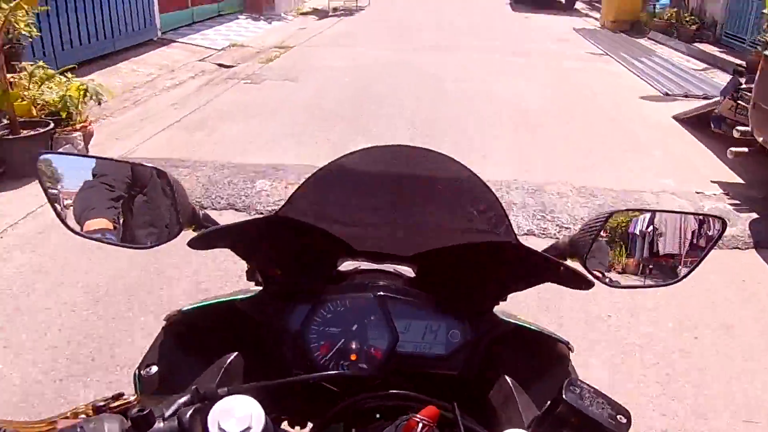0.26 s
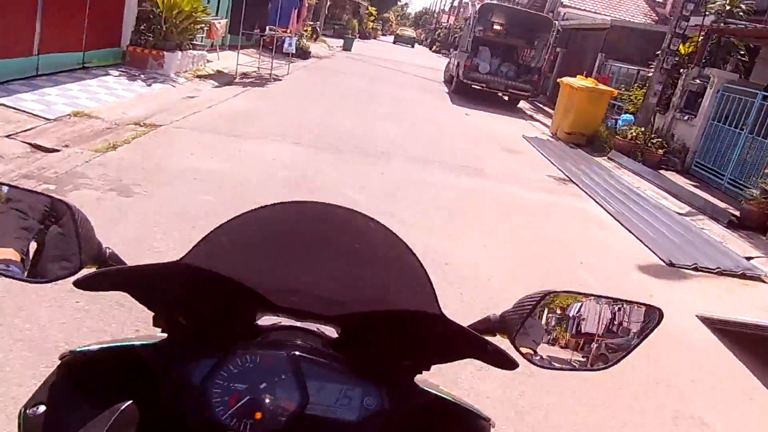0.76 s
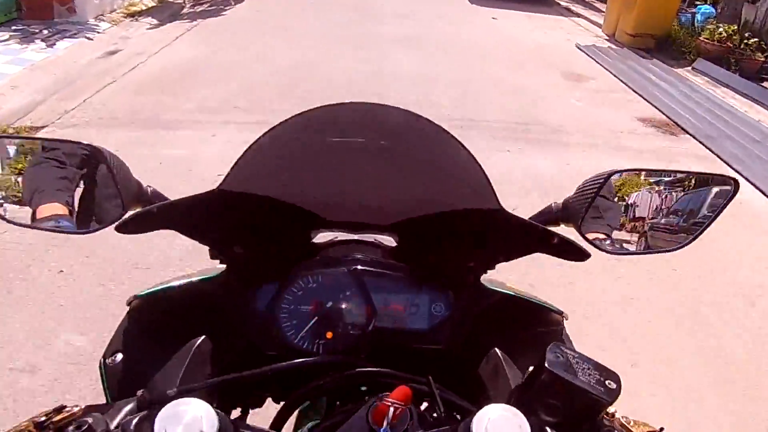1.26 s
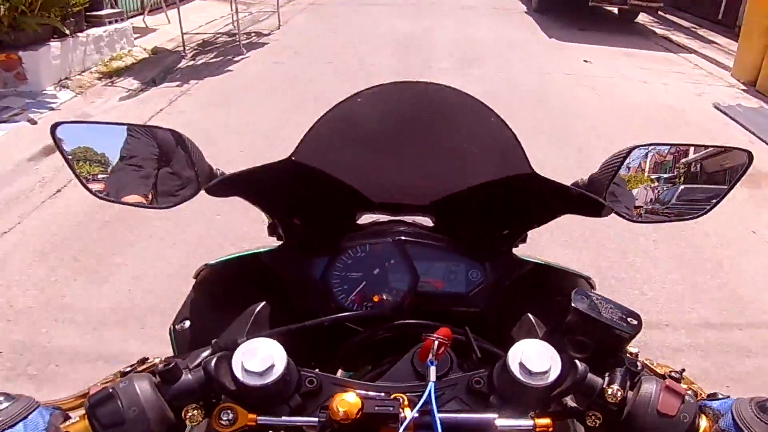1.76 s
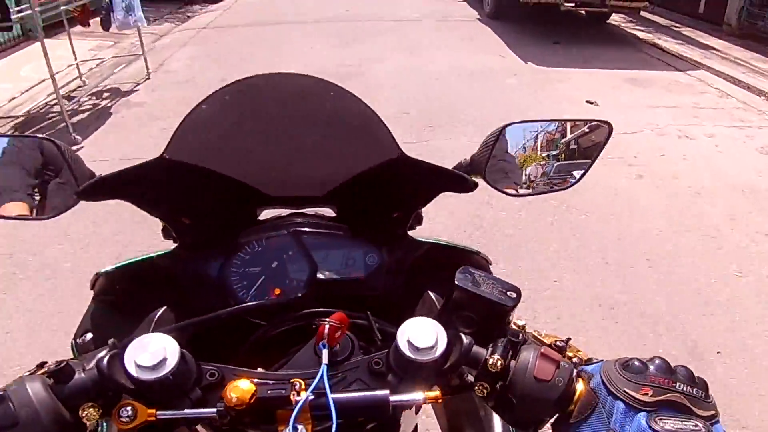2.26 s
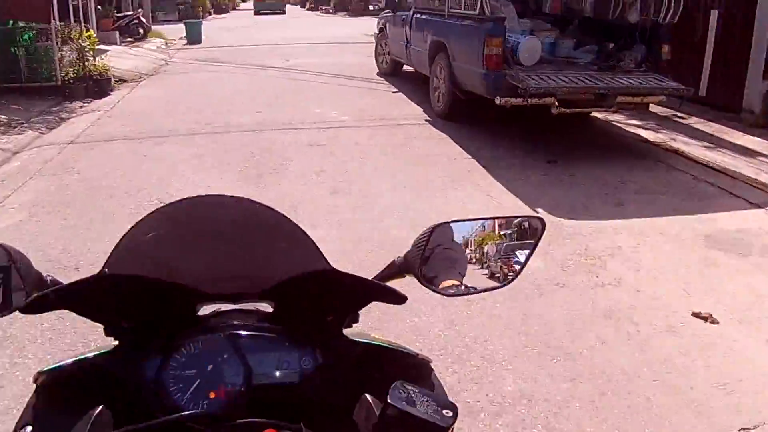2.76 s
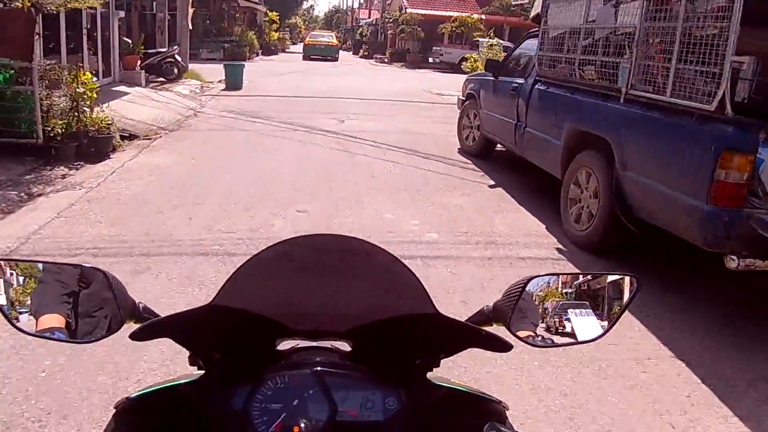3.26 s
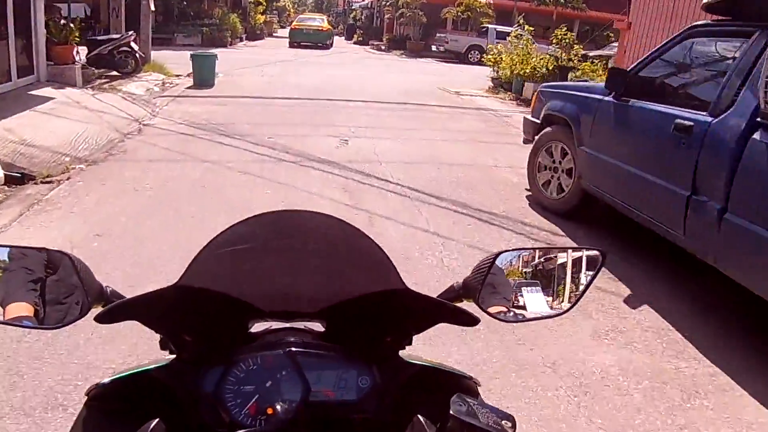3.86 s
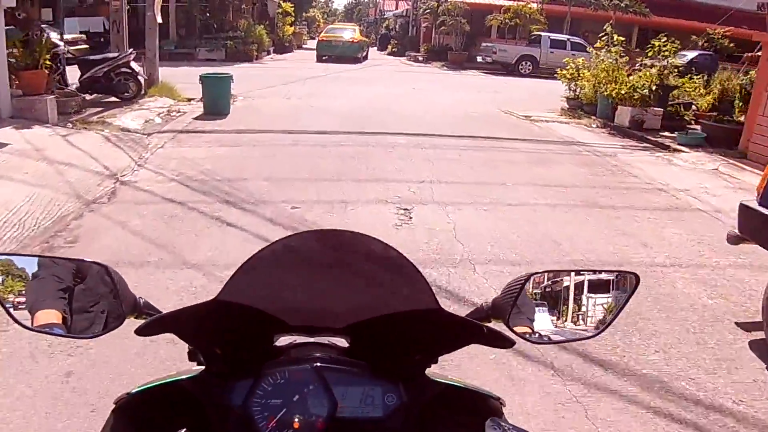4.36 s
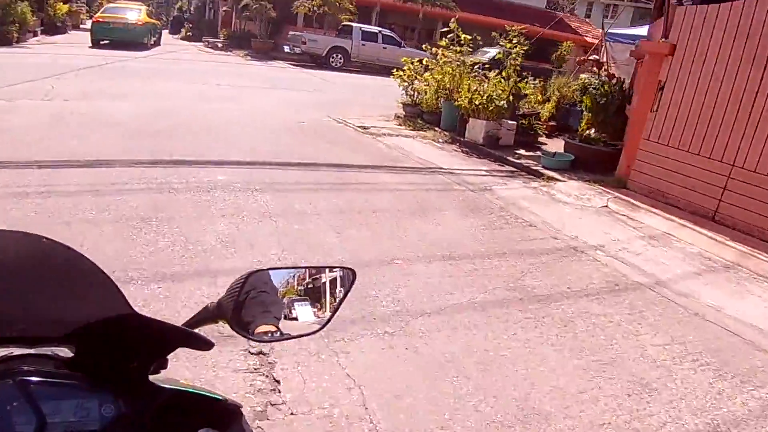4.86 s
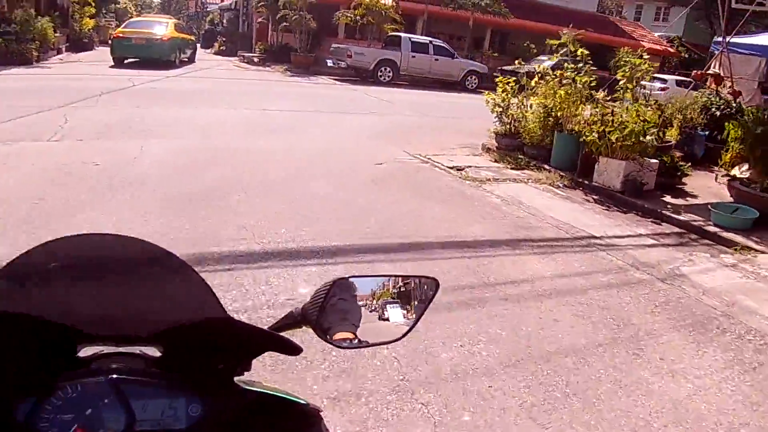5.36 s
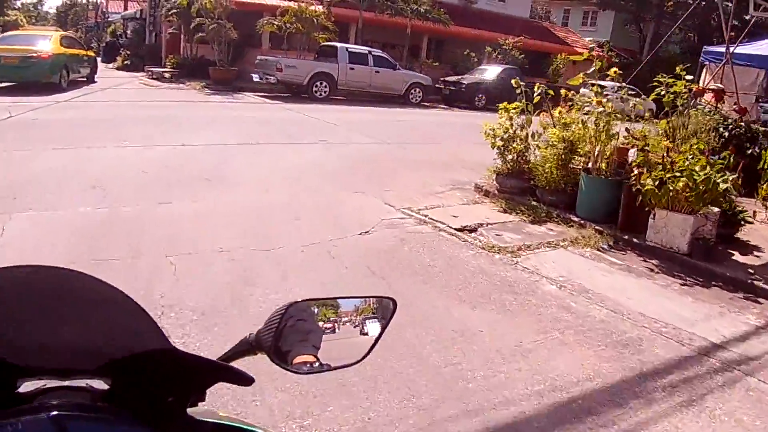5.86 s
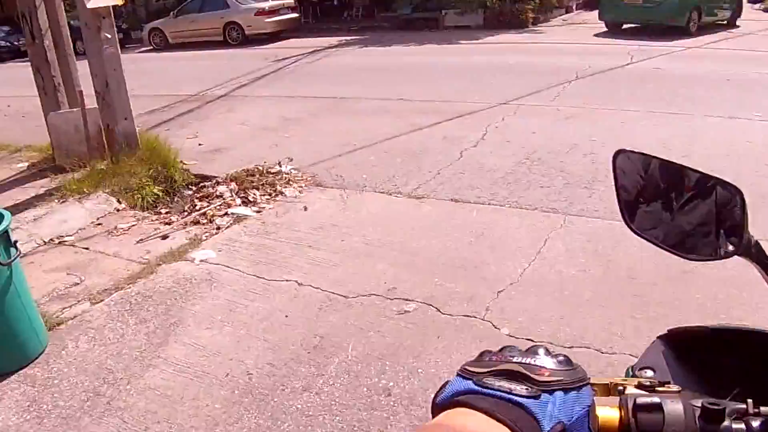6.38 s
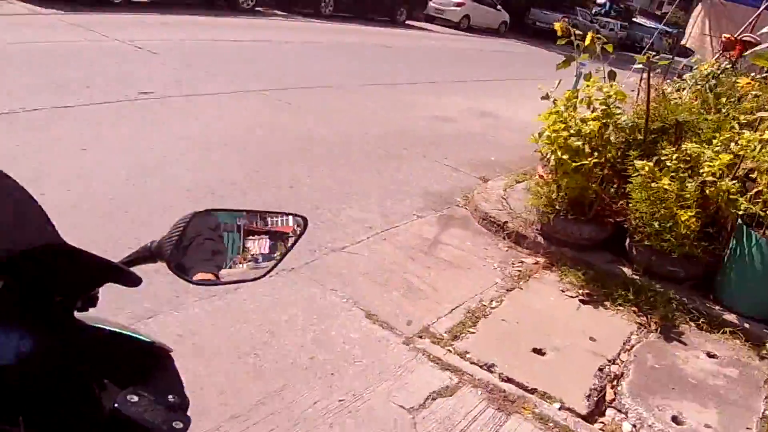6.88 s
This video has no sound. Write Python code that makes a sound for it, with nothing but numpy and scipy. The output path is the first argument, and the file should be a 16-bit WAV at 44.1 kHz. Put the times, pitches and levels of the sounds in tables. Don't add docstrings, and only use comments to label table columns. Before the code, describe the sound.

Low-rev motorcycle engine, throaty and pulsing, rolls along a narrow residential lane. Its pitch wavers early, holds fairly steady, then sinks after about four seconds. The microphone on the rider's helmet takes strong bump thuds early, a brief rattle near the middle and hard snaps late. Light mechanical hiss, faint chain and brake singing, wind buffets and tyre rumble fill the background; treble is dulled.

```python
import sys
import numpy as np
from scipy import signal
from scipy.fft import rfft, irfft, next_fast_len
from scipy.io import wavfile
from scipy.ndimage import uniform_filter1d, minimum_filter1d, map_coordinates

SR = 44100
rng = np.random.default_rng(int(sys.argv[2]) if len(sys.argv) > 2 else 0)


def output_pcm(signal):
    pcm = np.clip(np.atleast_2d(signal).T, -1, 1) * 32767
    wavfile.write(sys.argv[1], SR, np.round(pcm).astype(np.int16))


def amplitude_ratio(level_db):
    exponent = np.asarray(level_db, float) / 20
    return 10 ** exponent


N = 313992
MS = .001

# start_s, speed (four-stroke cycles per s)
SPEED = [(0.0, 21.72), (0.85, 24.66), (1.15, 23.31), (1.4, 25.97), (1.53, 24.57), (2.37, 24.84),
         (2.8, 24.15), (2.88, 24.7), (3.31, 24.3), (3.81, 25.24), (4.29, 24.92), (4.52, 22.98),
         (4.56, 23.66), (5.7, 21.86), (5.73, 20.58), (6.53, 18.77), (6.76, 20.02), (7.12, 19.01)]
# start_s, nearness_db
NEARNESS = [(0, 2), (.46, 1.5), (1.39, 2.5), (1.66, 0), (2.06, 1.5), (2.48, -0.5), (3.31, 0.5), (4.08, 1),
            (4.42, 0), (4.82, -1.5), (5.37, 0.5), (5.99, -1.5), (6.25, -.5), (6.56, -2.5), (6.86, -1),
            (7.12, -4.5)]
# start_s, peak_db, pitch_hz, rise_ms
THUDS = [(0.352, -36, 200, 6.6), (0.385, -36, 190, 5.9), (0.424, -36, 210, 6.6), (0.68, -21, 158, 5.9),
         (0.846, -30.5, 117, 2.5), (0.925, -20.5, 124, 2.7), (0.939, -28, 101, 3.8),
         (1.098, -25.5, 115, 2.1), (1.141, -24.5, 160, 3.4), (1.176, -15, 117, 2.8),
         (1.186, -6.5, 197, 1.5), (1.193, -17, 104, 3.1), (1.215, -34, 120, 5.6), (1.253, -24, 165, 4.7),
         (1.261, -21, 130, 6.5), (1.42, -26, 109, 5.5), (1.452, -21, 91, 1.8), (1.457, -16, 233, 6.4),
         (1.467, -21, 95, 13), (1.486, -28, 86, 3), (1.723, -29, 106, 2.3), (2.654, -27.5, 187, 5.5),
         (2.691, -35, 170, 21), (2.739, -32, 94, 4.7), (2.787, -33, 95, 4.1)]
# start_s, peak_db, pitch_hz, rise_ms
NUDGES = [(4.578, -18, 244, 2.9), (4.595, -30, 116, 4), (4.715, -31, 203, 4.6), (6.231, -21.5, 148, 2.5),
          (6.254, -27, 91, 3.2), (6.282, -25, 91.5, 2.5), (6.315, -26, 90, 8.3), (6.346, -20, 104, 1.7),
          (6.399, -21, 135, 4), (6.439, -24.5, 95, 4.5), (6.564, -29, 91.5, 2), (6.664, -25.5, 168, 2),
          (6.671, -22.5, 188, 3.3), (6.745, -22, 116, 1.3), (6.838, -24.5, 176, 5.1),
          (6.855, -23.5, 149, 3.2), (6.96, -22.5, 200, 4.8)]
# start_s, peak_db, upper_mode_hz, upper_over_lower_db, t60_ms
CLICKS = [(0.909, -41, 1400, 4, 13), (1.177, -26, 840, -5.5, 33), (1.186, -25, 1370, 0, 15.6),
          (1.458, -22, 880, -7.5, 11), (1.465, -30.5, 885, -2.5, 28), (1.479, -39.5, 1200, 1.5, 27),
          (1.508, -34, 960, -6, 21), (2.622, -33.5, 1450, -3.5, 26), (2.639, -23.5, 1380, -7, 14.3),
          (2.65, -31.5, 1370, -2, 14), (2.66, -38, 1220, -8, 14), (2.699, -30, 940, -5.5, 15)]
# start_s, peak_db, upper_mode_hz, upper_over_lower_db, t60_ms
SNAPS = [(4.569, -25, 910, -4, 13.5), (4.578, -26.5, 1610, -1, 7.2), (4.585, -28.5, 1160, -5, 7.6),
         (4.714, -26, 950, -6.5, 11.3), (6.196, -30, 1140, -1, 13), (6.202, -14.5, 1386, -7, 11.6),
         (6.212, -27, 990, -7, 37), (6.219, -33, 980, -2, 27), (6.235, -39, 1050, -2, 23),
         (6.349, -48, 851, 4, 17), (6.374, -47, 900, 5, 36), (6.564, -31.5, 890, -1.5, 15),
         (6.833, -30, 890, 4, 7.4), (6.847, -14, 1270, -5.5, 7.3), (6.856, -27.5, 880, -6.5, 35),
         (6.962, -36.5, 900, -2.5, 29)]


def unit(x):
    return x / np.sqrt(np.mean(x ** 2) + 1e-20)


def curves(rows):
    s, *cols = np.transpose(rows)
    return [np.interp(np.arange(N) / SR, s, c) for c in cols]


def wobble(rate):
    knots = rng.standard_normal(int(N * rate / SR) + 4)
    return map_coordinates(knots, [np.arange(N) * rate / SR])


def filtered(x, response):
    m = next_fast_len(N + SR // 2)
    return irfft(rfft(x, m) * response(np.fft.rfftfreq(m, 1 / SR)), m)[:N]


def patches(shape, bins, frames):
    field = uniform_filter1d(rng.standard_normal(shape), size=bins, axis=0)
    return unit(uniform_filter1d(field, size=frames, axis=1))


def rush(spectrum, patchy_db):
    z = signal.stft(rng.standard_normal(N + 512), nperseg=512)[2]
    z = z * amplitude_ratio(patchy_db * patches(z.shape, 3, 30))
    noise = signal.istft(z, nperseg=512)[1][:N]
    f, db = np.transpose(spectrum)
    return unit(filtered(noise, lambda hz: amplitude_ratio(np.interp(np.log(hz + 1), np.log(f + 1), db))))


def resonance(f, centre, width):
    return 1j * f * width / (centre * centre - f * f + 1j * f * width)


def soft_start(t, t60, rise):
    return amplitude_ratio(-60 * t / t60) * (1 - np.exp(-(t / rise) ** 2))


def ring(hz, t60, rise, t):
    shape = soft_start(t, t60, rise)
    return -np.sin(2 * np.pi * hz * t) * shape / shape.max()


def crank():
    first_firing = .770
    wander = .009
    return np.cumsum(curves(SPEED)[0]) / SR - first_firing + 1 + wander * wobble(5)


def firings(cycle, late, spread_db, jitter_s):
    turns = np.arange(1, 170) + late
    chance = rng.standard_normal((len(turns), 2))
    at = np.interp(turns, cycle, np.arange(N), left=-1, right=-1) + jitter_s * SR * chance[:, 0]
    keep = (at > 99) & (at < N - 1)
    return np.bincount(at[keep].astype(int), amplitude_ratio(spread_db * chance[keep, 1]), N)


def bark(cycle):
    # centre_hz, width_hz, level_db, polarity
    pipe_modes = [(85.7, 69, -4.5, 0.94), (231.4, 22.6, 1, 1), (333.3, 50, -3, 0.99), (516.4, 71, -6, -0.8)]
    # delay_ms, share
    returns = [(4.55, -.23), (7.1, .6), (10.3, .41)]
    first = firings(cycle, 0, 1.3, .0001)
    second = firings(cycle, .237, 1.6, .00014)

    def exhaust_path(f):
        puff = np.exp(-(f / 1050) ** 2)
        back = 1 + sum(share * np.exp(-2j * np.pi * f * ms * MS) for ms, share in returns)
        pipe = sum(sign * amplitude_ratio(db) * resonance(f, c, w) for c, w, db, sign in pipe_modes)
        return puff * back * pipe

    bright = unit(filtered(first + amplitude_ratio(-4.4) * second, exhaust_path))
    coast_hz, coast_db = 389, 1.5
    dull = filtered(bright, lambda f: 1 / (1 - (f / coast_hz) ** 2 + .8j * f / coast_hz))
    coast = np.interp(np.arange(N) / SR, (4.7, 6.4), [0, 0.38])
    return (1 - coast) * bright + coast * amplitude_ratio(coast_db) * unit(dull)


def hum(cycle):
    # centre_hz, half_width_hz, level_db
    silencer = (98, 7, 0)
    centre, half_width, db = silencer
    fourth = np.sqrt(2) * np.cos(8 * np.pi * (cycle - .056) + .25 * wobble(12))
    tuned = amplitude_ratio(db) / np.hypot(1, (5 * curves(SPEED)[0] - centre) / half_width)
    fifth = np.sqrt(2) * np.cos(10 * np.pi * (cycle - .105))
    return fourth + tuned * fifth


def exhaust(cycle):
    # start_s, throttle_db (over idle)
    throttle = [(0, 6), (.3, 4.5), (.61, 0.5), (.89, 5), (1.2, -5), (1.36, 6), (1.68, 0.5), (2.3, -0.5),
                (2.64, -3), (3.15, 2.5), (3.53, -0.5), (3.77, 2), (4.3, -1.5), (4.8, 2), (5.4, 1.5),
                (6.07, 2.5), (6.35, 4.5), (7.12, 3.5)]
    throttle_db, near_db = curves(throttle)[0], curves(NEARNESS)[0]
    bark_db = -45.5 + 0.16 * throttle_db + 0.28 * near_db
    hum_db = -45 + throttle_db
    return amplitude_ratio(bark_db + 3.0) * bark(cycle) + amplitude_ratio(hum_db + 1.0 + 1.13 * wobble(8)) * hum(cycle)


def shaking(t60):
    kicks, t = np.zeros(N), np.arange(SR) / SR
    for s, db, *_ in THUDS + NUDGES + CLICKS + SNAPS:
        kicks[round(s * SR)] += amplitude_ratio(2 * db)
    shape = soft_start(t, t60, .006)
    return np.sqrt(np.abs(signal.fftconvolve(kicks, shape ** 2)[:N]))


def gear(cycle):
    # pitch_hz, level_db (per Hz)
    rustle_colour = [(60, -9), (150, -4), (350, -4), (520, -6), (620, -12.5), (717, -13), (791, -2),
                     (921, -1), (971, -4), (1010, -10), (1160, -3), (1310, 0), (1490, 0), (1720, -3),
                     (1860, -8), (2170, -4.5), (2730, -24), (2900, -30), (3770, -61), (6380, -120)]
    # pitch_hz, level_db (per Hz)
    hiss_colour = [(1650, -58), (2800, -27), (2930, -17.5), (3090, -3), (3290, 4), (4270, -11),
                   (5440, -11.5), (6000, -9.5), (6480, -14.5), (6710, -48), (7000, -18.5), (9100, -52),
                   (15400, -120)]
    # centre_hz, width_hz, level_db
    casings = [(932, 21, 1), (1170, 108, -5.5), (1691, 22, 1), (2000, 90, -11.5)]
    near_db = curves(NEARNESS)[0]
    pace = curves(SPEED)[0] / 23.97
    seat = np.cos(2 * np.pi * (cycle - .48)) + 0.51 * np.cos(8 * np.pi * (cycle - .1))
    covers = lambda f: 1 + 1.72 * sum(amplitude_ratio(db) * resonance(f, c, w) for c, w, db in casings)

    rustle = amplitude_ratio(0.75 * seat + 0.86 * wobble(60)) * rush(rustle_colour, patchy_db=1.98)
    rustle = unit(filtered(rustle, covers))
    hiss = unit(amplitude_ratio(.6 * seat + .9 * wobble(40)) * rush(hiss_colour, patchy_db=.7))

    running = amplitude_ratio(-48.5 - 1.23 + 0.5 * near_db) * pace ** 1.36
    rattle = amplitude_ratio(-43) * shaking(t60=1)
    hiss_size = amplitude_ratio(-61 + 0.27 + near_db) * pace ** 0.74
    return np.hypot(running, rattle) * rustle + hiss_size * hiss


def mount():
    # start_s, peak_db, pitch_hz, t60_s
    booms = [
        (0.929, -30, 45, 0.14),
        (1.181, -19.5, 49.5, 0.078),
        (1.455, -14, 64, 0.18),
        (1.47, -20, 35.7, 0.17),
        (6.262, -30.5, 32.2, 0.26),
        (6.398, -33, 40.3, 0.17),
        (6.96, -31, 50, 0.078),
    ]
    # pitch_hz, level_db (per Hz)
    shell = [(500, -120), (750, -1.5), (950, 0), (1400, 1.5), (1750, -4.5), (2200, -10), (2700, -40),
             (3400, -14), (6000, -23), (7000, -120)]
    out, scrape, t = np.zeros(N + SR), np.zeros(N + SR), np.arange(SR // 2) / SR

    for s, db, hz, rise_ms in THUDS + NUDGES:
        t60 = (13 + 2.8 * rise_ms) * MS
        out[round(s * SR):][:len(t)] += amplitude_ratio(db + 2.5) * ring(hz, t60, rise_ms * MS, t)

    for s, db, hz, t60 in booms:
        out[round(s * SR):][:len(t)] += amplitude_ratio(db) * ring(hz, t60, .4 / hz, t)

    for s, db, high_hz, high_db, t60_ms in CLICKS + SNAPS:
        t60, start = t60_ms * MS, round(s * SR)
        low = ring(502, 0.47 * t60, 0.0039, t)
        high = amplitude_ratio(high_db + 4.0) * ring(high_hz, t60, 0.00031, t)
        out[start:][:len(t)] += amplitude_ratio(db + 2.5) * (low + high)
        fade = amplitude_ratio(db + high_db - 0.5 - 60 * t / (2.25 * t60))
        scrape[start:][:len(t)] += fade * (1 - np.exp(-t / 0.00093))

    padding = lambda f: 1 / (1 - (f / 2200) ** 2 + 1.3j * f / 2200) ** 2
    return filtered(out[:N] + scrape[:N] * rush(shell, patchy_db=3.0), padding)


def whine():
    # start_s, pitch_hz, level_db
    whines = [
        [(0, 1024, -61), (.4, 1065, -57), (.9, 1114, -63.5)],
        [(3.6, 1200, -68), (3.8, 1186, -54.5), (4.3, 1160, -66)],
        [(5.8, 1328, -72), (5.92, 1330, -57), (6.05, 1302, -68), (6.14, 1238, -51), (6.22, 1252, -51)],
    ]
    out, t = np.zeros(N), np.arange(N) / SR
    for rows in whines:
        hz, db = curves(rows)
        fade = np.clip(np.minimum(t - rows[0][0], rows[-1][0] - t) / 0.0085, 0, 1)
        phase = 2 * np.pi * np.cumsum(hz) / SR + .9 * wobble(50)
        out += fade * amplitude_ratio(db + 3.5 * wobble(40)) * np.sqrt(2) * np.sin(phase)
    return out


def wind():
    # start_s (the middle of the puff), peak_db, half_length_s
    puffs = [(0.01, -48, 0.032), (5.2, -59, .1), (5.7, -61, 0.11), (.3, -50, 0.14), (.55, -48, 0.17),
             (.95, -48, 0.071), (1.2, -34, 0.14), (1.55, -36, 0.091), (2.44, -50, .08), (2.743, -46, 0.16),
             (3.05, -50, 0.041), (3.27, -64, 0.041), (3.52, -48, .07), (3.826, -41, 0.057),
             (4.28, -46, .04), (4.445, -44, 0.076), (4.65, -48, .1), (5.45, -52, .1), (6.098, -48, 0.09),
             (6.3, -48, 0.11), (6.76, -53, 0.07), (6.963, -38, 0.062)]
    # pitch_hz, level_db (per Hz)
    buffet_colour = [(10, 7.5), (22, -1.5), (40, -9), (55, -5.5), (75, -43), (120, -44), (200, -120)]
    t = np.arange(N) / SR
    gusts = amplitude_ratio(-50.5)
    gusts = gusts + sum(amplitude_ratio(db - 1.0) * np.exp(-((t - s) / half) ** 2) for s, db, half in puffs)
    return gusts * amplitude_ratio(0.84 * wobble(13)) * rush(buffet_colour, patchy_db=0.9)


def roar():
    # pitch_hz, level_db (per Hz)
    roar_colour = [(40, -120), (70, -9), (160, -4), (300, -4), (500, -6), (700, -14), (900, -120)]
    smooth_road = amplitude_ratio(-53.5 + 2.2 * wobble(4))
    rumble = amplitude_ratio(-18.5) * shaking(t60=0.2)
    return np.hypot(smooth_road, rumble) * amplitude_ratio(3.8 * wobble(25)) * rush(roar_colour, patchy_db=-1.2)


def scene():
    cycle = crank()
    return (exhaust(cycle) + gear(cycle) + mount() + whine() + wind() + roar())[None]


def hiss_and_wash(sound):
    # pitch_hz, level_db (per Hz)
    noise_colour = [(4000, -21), (6800, -13), (7940, -10), (8480, -5), (11400, -9.5), (15700, -7.5)]
    blow = -minimum_filter1d(-np.abs(sound), size=1100)
    blow = uniform_filter1d(blow, size=250)
    wash = np.clip(blow - .13, 0, .4)
    return (amplitude_ratio(-77.0) + amplitude_ratio(-49) * wash) * rush(noise_colour, patchy_db=2.0)


def muted(x):
    # pitch_hz, share (of patches muted)
    holes = [(2000, 0.02), (3000, 0.16), (5000, 0.32), (7000, 0.48), (15000, 0.42)]
    hz, _, z = signal.stft(x, SR, nperseg=2048)
    field = patches(z.shape, 4, 6)
    share = np.clip(np.interp(hz, *np.transpose(holes)), 0, .9)[:, None]
    keep = 1 / (1 + np.exp(-1.7 * field)) > share
    return signal.istft(z * np.where(keep, 1, .03), SR, nperseg=2048)[1][:N]


def top_cut(x):
    return signal.sosfilt(signal.butter(12, 15890, fs=SR, output="sos"), x)


def record(dry):
    heard = muted(dry[0] + hiss_and_wash(dry[0]))
    return top_cut(filtered(heard, lambda hz: hz < 15760)[None])


dry = scene()
out = record(dry)
output_pcm(out)
```